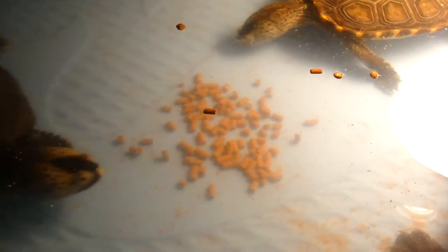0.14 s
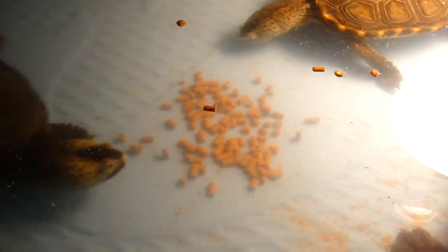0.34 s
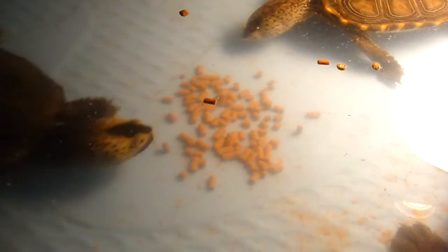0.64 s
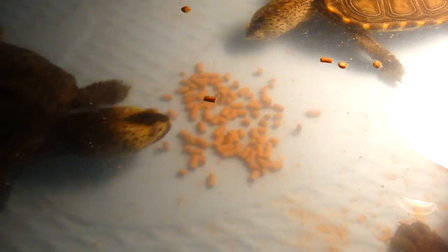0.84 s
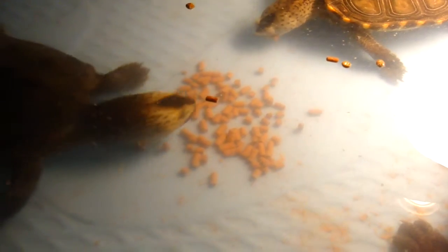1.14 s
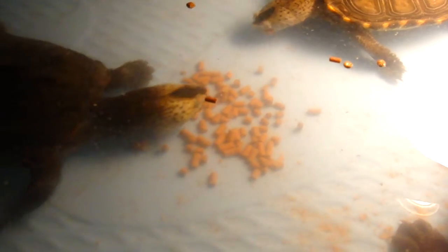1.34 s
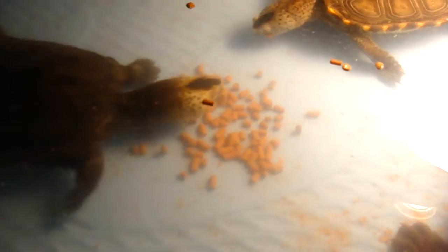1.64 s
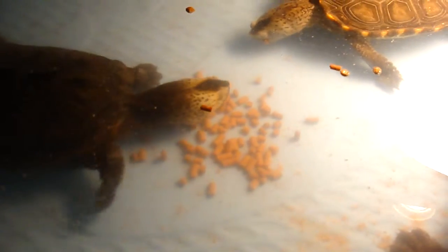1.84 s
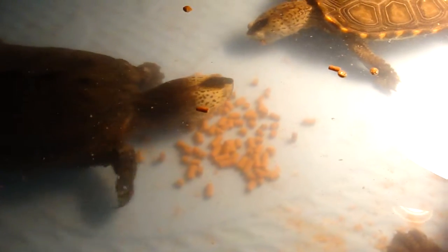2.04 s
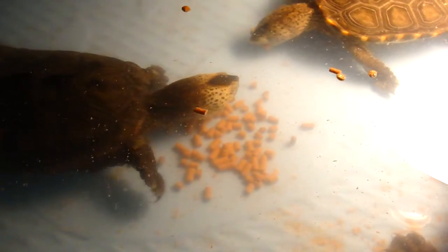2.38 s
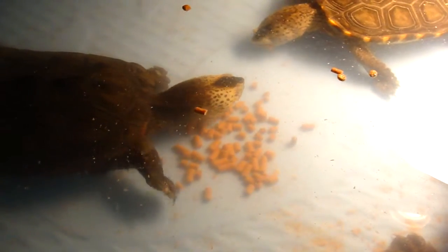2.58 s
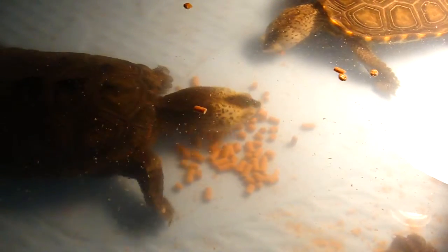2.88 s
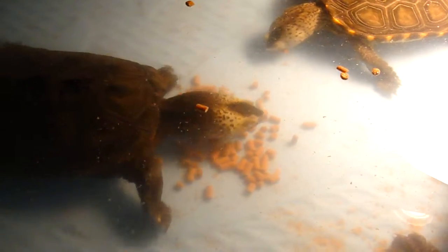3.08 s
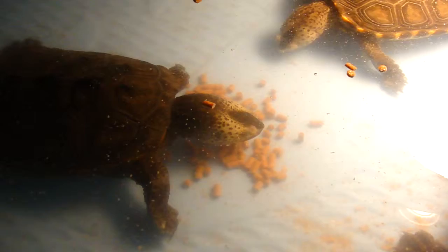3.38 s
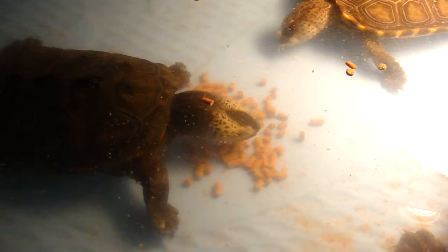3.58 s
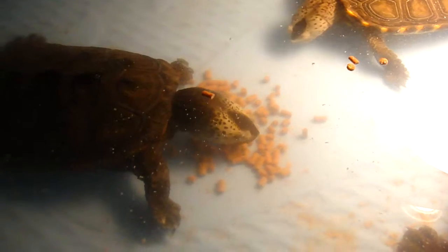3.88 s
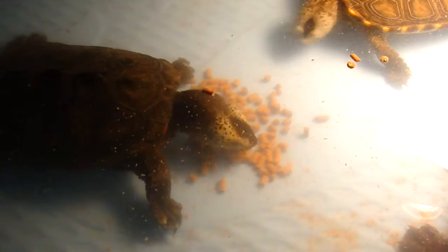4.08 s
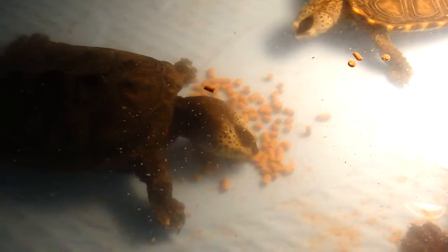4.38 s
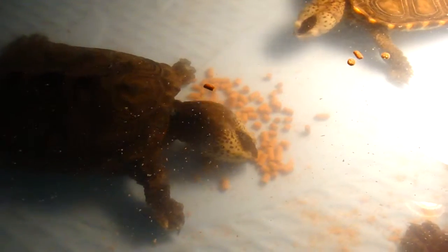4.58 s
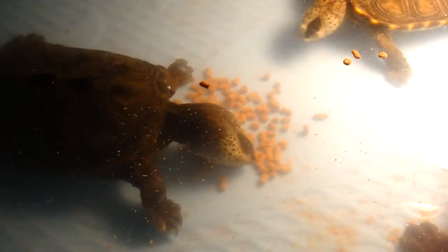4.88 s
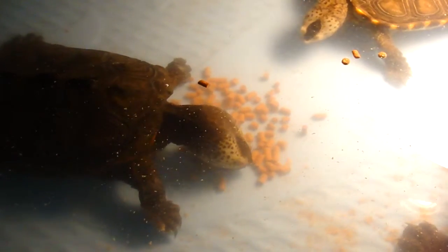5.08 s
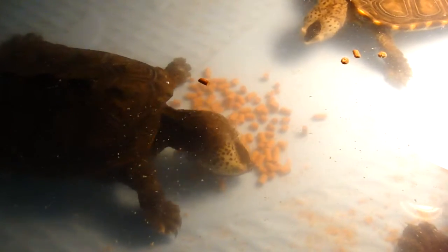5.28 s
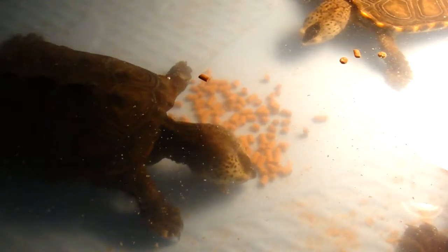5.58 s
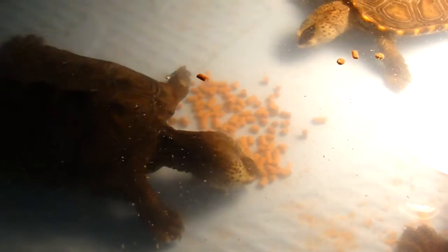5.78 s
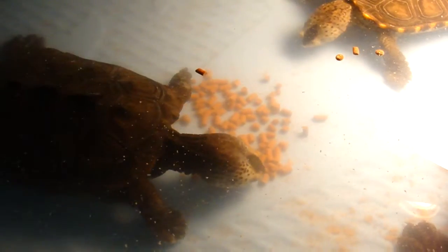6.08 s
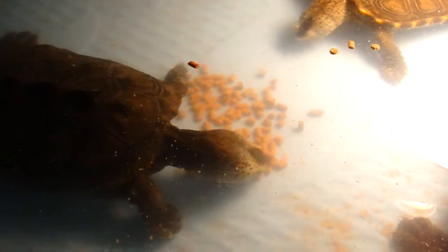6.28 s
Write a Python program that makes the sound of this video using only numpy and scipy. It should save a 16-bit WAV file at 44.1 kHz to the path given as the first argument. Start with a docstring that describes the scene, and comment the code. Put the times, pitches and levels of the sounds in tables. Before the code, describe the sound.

Water churns and bubbles without a break as a filter's stream falls into an aquarium, heard close up with the short echo of a small room. Fine plinks and little splashes dot the rush, while crisp droplets stand out early on and again in a cluster past the middle. Two small dry ticks sound far apart. A hollow gurgle and a faint, even pump hum lie below the water all the way through.

```python
"""An aquarium filter's return stream pours into a tank in a small, hard-walled room.
It churns the water, drives bubbles of all sizes under the surface and throws splashes and droplets.
Two dry ticks snap; below the water the hollows of the filter box gurgle and the pump hums.
Both channels carry the same signal."""
import sys
import numpy as np
from scipy import signal
from scipy.fft import rfft, irfft, next_fast_len
from scipy.io import wavfile
from scipy.ndimage import map_coordinates

SR = 44100
rng = np.random.default_rng(int(sys.argv[2]) if len(sys.argv) > 2 else 0)


def master_out(mix):
    """Clip the mix to full scale and print it as 16-bit PCM to the path in sys.argv[1]."""
    frames = np.transpose(np.atleast_2d(mix))
    ceiling = np.clip(frames, -1, 1)
    pcm = np.round(ceiling * 32767).astype(np.int16)
    wavfile.write(sys.argv[1], SR, pcm)


N = 283563
TOP_HZ = 11000


def stream(rush_db=-39.5, swarm_db=-40, flutter_db=0.78, flutter_hz=25, follow=0.55):
    """Churning water and its bubbles swell with the fluttering flow and ring the air in the tank."""
    # stream strength: time_s, level_db
    flow_curve = [(0.0, -35), (1.23, -35), (1.59, -33.5), (2.13, -36), (3.08, -34.5), (4.21, -37),
                  (4.49, -37), (4.93, -35.5), (5.17, -35.5), (6.09, -35.5), (6.43, -32)]
    # spectrum of spray and churning: freq_hz, gain_db
    rush_spectrum = [(25, -36), (60, -20.5), (120, -13.5), (300, -1), (600, -0.5), (800, -7), (1150, -3.5),
                     (1550, -3), (2400, -4), (3100, -1), (4000, -6), (5200, -4), (6500, -6), (8500, -6),
                     (11000, -8.5)]
    # air modes over the water: freq_hz, width_hz, gain_db
    tank_modes = [(895, 27, -2), (933, 26, 1), (1028, 47, -3.5), (1127, 21, 2.5), (1253, 72, 0),
                  (1730, 43, -6), (1887, 216, -4), (2163, 89, -2), (2375, 160, -0.5), (2750, 59, -21),
                  (3400, 51, -7), (3870, 120, -3), (4090, 106, -3), (6560, 540, -11.5)]
    strength_db = np.interp(np.arange(N) / SR, *np.transpose(flow_curve))
    flow = amp(follow * (strength_db - strength_db.mean()) + flutter_db * wobble(flutter_hz))
    noise = rng.standard_normal(N)
    rush = unit(filtered(noise, lambda hz: spectrum_gain(hz, rush_spectrum) * hz / (hz + 20)))
    water = flow * (amp(rush_db) * rush + amp(swarm_db) * swarm())
    return filtered(water, lambda hz: 1 + resonances(hz, tank_modes))


def swarm(low_hz=700, spread_db=2.5, cycles=26, spots=30, per_spot=170):
    """Hundreds of small bubbles a second, from many spots around the inflow; rms 1."""
    # swarm colour: freq_hz, gain_db
    swarm_spectrum = [(500, 4.5), (900, -9), (1250, -1), (1550, -3), (2400, -2.5), (3100, 0.5), (4100, 1),
                      (5200, 3.5), (6700, 4), (8500, 1), (11000, -6.5)]
    out = np.zeros(N)
    for _ in range(spots):
        when, pitch, life = rng.random((3, per_spot))
        pitch_hz = low_hz * (TOP_HZ / low_hz) ** pitch
        strength = amp(spread_db * np.minimum(rng.standard_normal(per_spot), 2))
        rings = strength[:, None] * ping(pitch_hz, cycles * (0.5 + life), rise=0.026)
        index = (when * N).astype(int)[:, None] + np.arange(rings.shape[1])
        bubbles = np.bincount(index.ravel(), rings.ravel(), N)[:N]
        out += signal.oaconvolve(bubbles, room(wet_db=7, t60_s=0.29))[:N]
    return unit(filtered(out, lambda hz: spectrum_gain(hz, swarm_spectrum)))


def near_bubbles(gain_db=-1.5, satellite_db=-7, clean_db_per_cycle=0.1, scatter_oct=0.15, trail_s=0.03):
    """Loud bubbles trail two satellites each; the longer the ring, the fainter the satellites."""
    # low gulps to fine plinks: start_s, pitch_hz, level_db, ring_cycles
    bubbles = [(0.088, 6200, -33, 19), (0.129, 6160, -31, 13), (0.186, 6450, -32, 20),
               (0.214, 7640, -33.5, 9.2), (0.31, 483, -31.5, 50), (0.328, 10100, -32, 10),
               (0.373, 4800, -28, 12), (0.39, 5000, -44, 55), (0.415, 490, -34, 38), (0.511, 1250, -28, 22),
               (0.567, 1310, -33.5, 20), (0.575, 1060, -38, 30), (0.63, 400, -35.5, 13),
               (0.652, 888, -35.5, 69), (0.722, 2870, -35, 32), (0.795, 2090, -37.5, 30),
               (0.862, 1010, -36, 36), (1.031, 3920, -31.5, 34), (1.087, 4380, -32, 16),
               (1.285, 2650, -26, 16), (1.312, 2780, -42, 20), (1.336, 1400, -37, 38),
               (1.341, 487, -34, 52), (1.349, 2440, -38, 40), (1.369, 4370, -35, 30),
               (1.535, 2200, -39, 35), (1.543, 1236, -31, 35), (1.701, 945, -38, 32),
               (1.827, 8700, -31.5, 17), (1.853, 5030, -34, 42), (1.895, 1250, -36, 34),
               (1.903, 6730, -33.5, 20), (1.998, 760, -35.5, 46), (2.014, 4120, -32, 40),
               (2.111, 5130, -33, 20), (2.235, 7560, -35.5, 30), (2.255, 1240, -33, 24),
               (2.276, 1035, -34.5, 49), (2.324, 7050, -33, 6.2), (2.355, 6760, -25.5, 7.6),
               (2.512, 4500, -38, 16), (2.547, 1610, -36, 40), (2.603, 7160, -28.5, 5.2),
               (2.671, 402, -34.5, 19), (2.762, 1230, -36.5, 40), (2.849, 3990, -32.5, 25),
               (2.922, 4120, -33, 56), (3.048, 7460, -31, 8.9), (3.295, 2470, -32.5, 14),
               (3.354, 528, -35.5, 22), (3.354, 1270, -40, 33), (3.358, 1890, -38, 35),
               (3.397, 1770, -34.5, 63), (3.535, 1940, -34, 51), (3.558, 1190, -30.5, 14),
               (3.728, 2380, -33.5, 40), (3.866, 5900, -30.5, 8.7), (3.938, 2900, -35, 41),
               (3.955, 1030, -35.5, 30), (4.178, 1230, -35.5, 45), (4.187, 4100, -39, 41),
               (4.323, 3290, -30, 52), (4.342, 3290, -39, 90), (4.423, 3200, -37, 55),
               (4.441, 1790, -33.5, 39), (4.474, 3600, -33, 18), (4.485, 6560, -27.5, 15),
               (4.617, 1560, -38, 40), (4.644, 6600, -28.5, 15), (4.68, 950, -34, 18),
               (4.786, 2470, -37, 45), (4.802, 1880, -34, 40), (4.853, 4900, -28.5, 6.8),
               (4.867, 1280, -36.5, 35), (4.905, 4120, -36, 45), (4.96, 2400, -29, 15),
               (4.961, 3160, -36, 12), (4.961, 4170, -31.5, 43), (5.025, 3180, -35.5, 38),
               (5.04, 440, -33.5, 18), (5.113, 1220, -33, 23), (5.19, 474, -34, 46), (5.204, 2470, -35, 50),
               (5.25, 3980, -37.5, 82), (5.442, 3960, -34.5, 70), (5.506, 4200, -35, 62),
               (5.574, 1230, -33, 26), (5.58, 4240, -31.5, 66), (5.636, 5350, -34, 45),
               (5.855, 487, -33.5, 24), (5.9, 1560, -34, 60), (5.946, 480, -34, 41), (5.958, 3944, -33, 35),
               (5.989, 1280, -35, 57), (6.019, 1276, -34, 58), (6.023, 2800, -35.5, 30),
               (6.019, 430, -36.5, 25), (6.066, 1690, -37, 32), (6.12, 484, -31, 56),
               (6.206, 4000, -31, 25), (6.317, 1260, -32, 53), (6.34, 800, -42, 24)]
    out = np.zeros(N)
    for start_s, pitch_hz, level_db, cycles in bubbles:
        add(out, start_s, plink(pitch_hz, level_db + gain_db, cycles))
        trail_db = level_db + satellite_db - clean_db_per_cycle * cycles
        for when, pitch in rng.random((2, 2)):
            satellite_hz = pitch_hz * 2 ** (scatter_oct * (2 * pitch - 1))
            add(out, start_s + trail_s * when, plink(satellite_hz, trail_db, cycles))
    return out


def plink(pitch_hz, level_db, cycles):
    """One near bubble and its echoes, with the energy of 10 ms at level_db rms."""
    bubble = ping(pitch_hz, cycles, rise=0.012, samples=2000)[0]
    sound = signal.fftconvolve(bubble, room(wet_db=7, t60_s=0.16, early_db=5))
    return amp(level_db) * np.sqrt(0.01 * SR) * sound / np.linalg.norm(sound)


def ping(pitch_hz, cycles, rise, samples=900):
    """One bubble a row, energy 1: swells, falls 60 dB over `cycles`, climbs in pitch near the surface."""
    age_cycles = np.reshape(pitch_hz, (-1, 1)) * np.arange(samples) / SR
    life = age_cycles / np.reshape(cycles, (-1, 1))
    phase = 2 * np.pi * age_cycles * (1 + rise * np.minimum(life, 1))
    wave = np.sin(phase) * amp(-60 * life) * (1 - np.exp(-age_cycles / 2))
    return wave / np.linalg.norm(wave, axis=1, keepdims=True)


def splashes(per_splash=40):
    """Each splash sheds short-lived bubbles that blend into a rough fizz."""
    # bubble clouds: start_s, length_s, pitch_hz, scatter_oct, level_db
    clouds = [(0.255, 0.025, 5500, 0.3, -36.5), (0.632, 0.02, 3600, 0.14, -38),
              (0.714, 0.04, 2330, 0.24, -38.5), (1.534, 0.018, 4500, 0.15, -36.5),
              (2.016, 0.037, 5400, 0.56, -35), (2.577, 0.017, 8600, 0.12, -36),
              (2.658, 0.026, 1880, 0.24, -37.5), (2.828, 0.032, 4900, 0.53, -36.5),
              (3.007, 0.045, 5330, 0.14, -35.5), (3.05, 0.044, 5600, 0.35, -42),
              (3.215, 0.03, 6600, 0.27, -38), (3.593, 0.035, 4040, 0.15, -37),
              (3.724, 0.02, 2430, 0.12, -38.5), (3.78, 0.024, 3280, 0.2, -33),
              (4.371, 0.024, 4530, 0.11, -39), (4.501, 0.031, 6200, 0.29, -33),
              (4.58, 0.013, 6300, 0.32, -33.5), (5.727, 0.023, 4640, 0.29, -32.5),
              (6.046, 0.028, 2470, 0.23, -32)]
    out = np.zeros(N)
    for start_s, length_s, pitch_hz, scatter_oct, level_db in clouds:
        cloud = np.zeros(SR // 8)
        delays_s = length_s * rng.random(per_splash)
        offsets_oct = scatter_oct * np.clip(rng.standard_normal(per_splash), -2, 2)
        for delay_s, offset_oct in zip(delays_s, offsets_oct):
            add(cloud, delay_s, ping(pitch_hz * 2 ** offset_oct, cycles=14, rise=0)[0])
        fizz = signal.fftconvolve(cloud, room(wet_db=0, t60_s=0.12))
        add(out, start_s, amp(level_db) * np.sqrt(length_s * SR) * fizz / np.linalg.norm(fizz))
    return out


def droplets(near_gain_db=17, patter_db=-13.5, range_db=6, patter_count=300):
    """Bright slaps on the surface: a few strong ones over a dense, light patter."""
    # strong droplets: start_s, level_db, highpass_hz
    drops = [(0.329, -16, 8000), (0.376, -16, 9000), (0.508, -29, 5000), (0.8447, -10.5, 8200),
             (2.134, -18, 5500), (2.4335, -18, 2500), (2.604, -23, 8500), (4.645, -14, 7000),
             (4.74, -13.5, 8000), (4.85, -16, 6000), (4.962, -20, 1500), (6.18, -15, 6000),
             (6.367, -18, 6500)]
    near, patter = np.zeros((2, N))
    for start_s, level_db, highpass_hz in drops:
        b, a = signal.butter(2, highpass_hz, "high", fs=SR)
        crack = signal.lfilter(b, a, slap(wet_db=6, attack_s=0.0006))
        add(near, start_s, amp(level_db + near_gain_db) * crack)
    for when, strength in rng.random((patter_count, 2)):
        crack = slap(wet_db=7, attack_s=0.0026)
        add(patter, when * N / SR, amp(patter_db + range_db * strength) * crack)
    return near + filtered(patter, lambda hz: highpass(hz, edge_hz=3000))


def slap(wet_db, attack_s, t60_s=0.01):
    """A droplet's brief crack and its echo, energy 1."""
    t = np.arange(SR // 50) / SR
    burst = rng.standard_normal(len(t)) * amp(-60 * t / t60_s) * (1 - np.exp(-t / attack_s))
    crack = signal.fftconvolve(burst, room(wet_db, t60_s=0.15))
    return crack / np.linalg.norm(crack)


def ticks(t60_s=0.0011):
    """Close snaps without bass that die within two cycles, with a short echo."""
    # dry ticks: start_s, level_db, pitch_hz
    snaps = [(0.5186, -18, 1150), (5.7198, -15, 1700)]
    out = np.zeros(N)
    t = np.arange(SR // 100) / SR
    for start_s, level_db, pitch_hz in snaps:
        snap = np.cos(2 * np.pi * pitch_hz * t) * amp(level_db - 60 * t / t60_s)
        add(out, start_s, signal.fftconvolve(snap, room(wet_db=2, t60_s=0.066, early_db=-2)))
    return filtered(out, lambda hz: highpass(hz, edge_hz=450))


def gurgle(level_db=-44, surge_db=1, surge_hz=14):
    """Uneven splashing rings the hollows of the filter box; each throbs on its own."""
    # hollow resonances: freq_hz, width_hz, gain_db
    hollows = [(173.6, 23, -6), (313, 26, -8), (344.3, 25, 0.5), (361, 16.7, 2.5), (390, 54, -3.5),
               (432, 8.1, -1.5), (478, 17.6, 2.5), (490.4, 20, 5.5), (533.6, 22, -1), (1235, 43, -11)]
    out = np.zeros(N)
    for hollow in hollows:
        drive = unit(rng.standard_normal(N) * amp(surge_db * wobble(surge_hz)))
        out += filtered(drive, lambda hz: resonances(hz, [hollow]) * highpass(hz, edge_hz=150) ** 2)
    return amp(level_db) * unit(out)


def pump(drift_rad=0.46, drift_ref_hz=241.6):
    """Hum lines waver with the load on the impeller; the upper ones drift most in phase."""
    # mains hum and the housing tones it excites: freq_hz, rms_db, waver_db
    hum_lines = [(86.5, -77, 1), (119.6, -63.5, 0.8), (218.3, -64, 1.5), (241.6, -63, 0), (362, -55, 2.5),
                 (434, -55, 2.5), (492.6, -55.5, 2)]
    out = np.zeros(N)
    t = np.arange(N) / SR
    for freq_hz, rms_db, waver_db in hum_lines:
        peak = np.sqrt(2) * amp(rms_db + waver_db * wobble(rate_hz=5))
        phase = 2 * np.pi * (freq_hz * t + rng.random())
        drift = drift_rad * freq_hz / drift_ref_hz * wobble(rate_hz=4.7)
        out += peak * np.sin(phase + drift)
    return out


def room(wet_db, t60_s, early_db=3, early_t60_s=0.039):
    """Impulse response from one spot on the water: direct sound, quick tank echoes, room tail."""
    t = np.arange(SR // 4) / SR
    early, tail = rng.standard_normal((2, len(t))) * amp(-60 * t / [[early_t60_s], [t60_s]])
    path = amp(early_db) * early / np.linalg.norm(early) + amp(wet_db) * tail / np.linalg.norm(tail)
    path[0] += 1
    return path


def resonances(hz, modes):
    """Summed band-pass response of (freq_hz, width_hz, gain_db) modes."""
    return sum(amp(gain_db) * 1j * hz * width_hz / (freq_hz ** 2 - hz ** 2 + 1j * hz * width_hz)
               for freq_hz, width_hz, gain_db in modes)


def highpass(hz, edge_hz):
    """First-order high-pass response."""
    return 1j * hz / (edge_hz + 1j * hz)


def spectrum_gain(hz, points):
    """Linear gain from (freq_hz, gain_db) points on a log frequency axis."""
    freq_hz, gain_db = np.transpose(points)
    return amp(np.interp(np.log(hz + 1), np.log(freq_hz), gain_db))


def filtered(x, response):
    """Apply response(hz) by FFT."""
    size = next_fast_len(N + SR // 2)
    return irfft(rfft(x, size) * response(np.fft.rfftfreq(size, 1 / SR)), size)[:N]


def wobble(rate_hz):
    """Smooth random curve, rate_hz knots a second."""
    knots = rng.standard_normal(int(N * rate_hz / SR) + 4)
    return map_coordinates(knots, [np.arange(N) * rate_hz / SR])


def add(track, start_s, sound):
    """Mix a sound into the track in place."""
    part = track[max(round(start_s * SR), 0):][:len(sound)]
    part += sound[:len(part)]


def amp(db):
    """Decibels to gain."""
    return 10 ** (np.asarray(db) / 20)


def unit(x):
    """Scale to rms 1."""
    return x / np.sqrt(np.mean(x ** 2) + 1e-20)


def scene():
    """Water and pump, the same in both channels."""
    mono = stream() + near_bubbles() + splashes() + droplets() + ticks() + gurgle() + pump()
    return np.array([mono, mono])


def record(dry, rolloff_hz=10800):
    """The treble rolls off and ends at TOP_HZ."""
    lowpass = lambda hz: (hz < TOP_HZ) / np.sqrt(1 + (hz / rolloff_hz) ** 10)
    return np.array([filtered(channel, lowpass) for channel in dry])


dry = scene()
out = record(dry)
master_out(out)
```